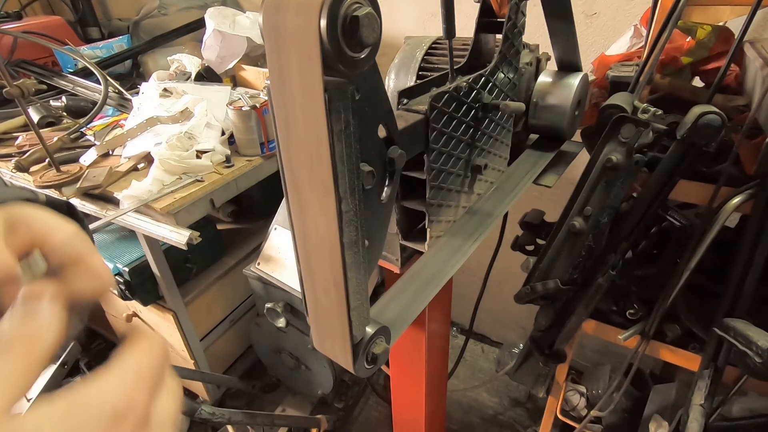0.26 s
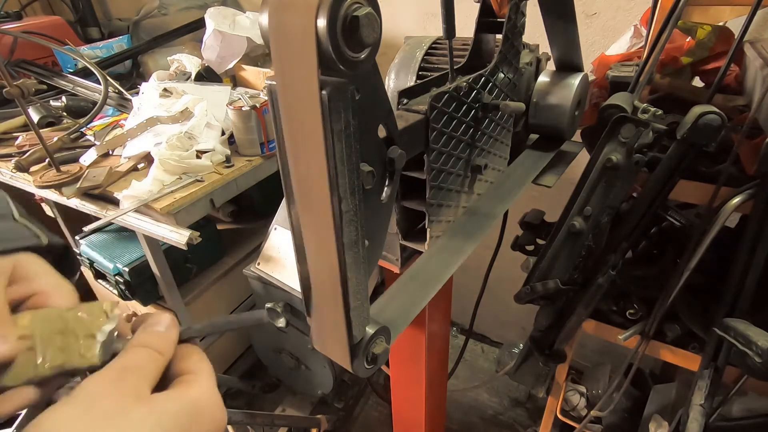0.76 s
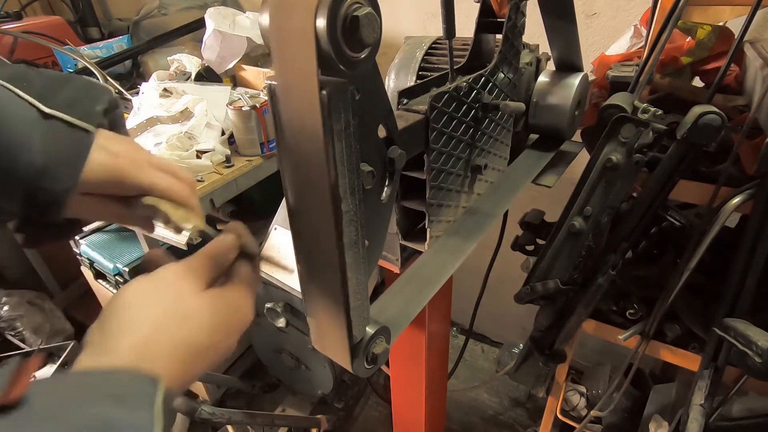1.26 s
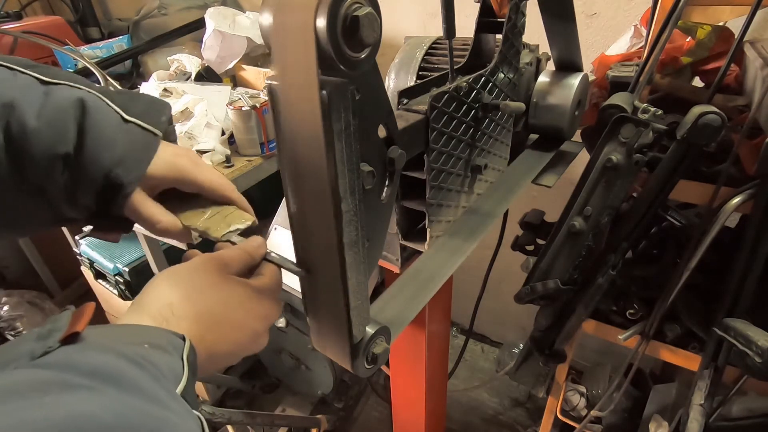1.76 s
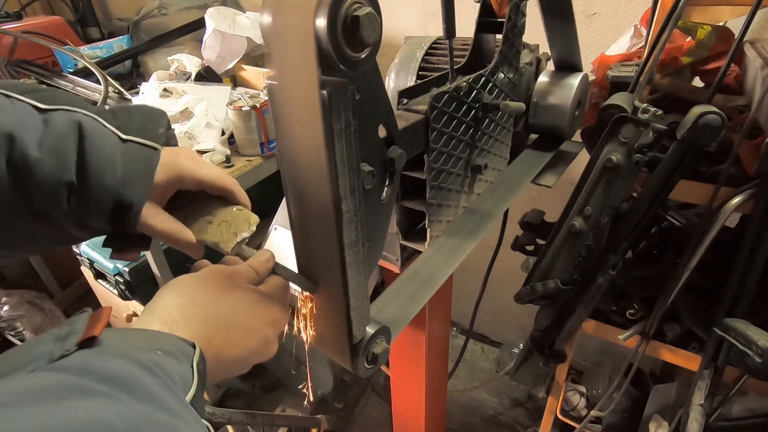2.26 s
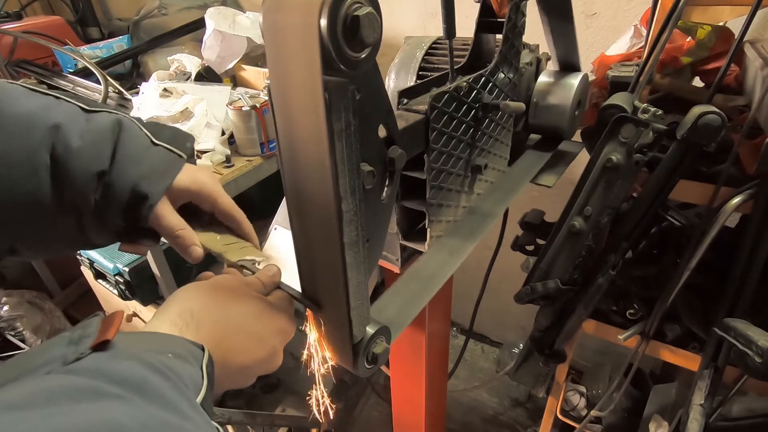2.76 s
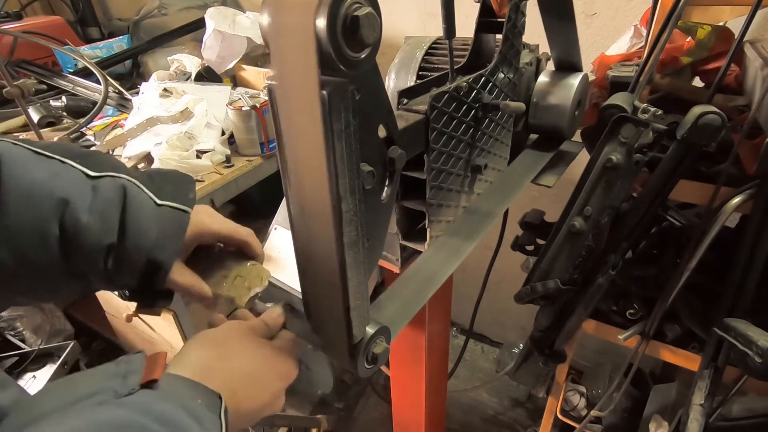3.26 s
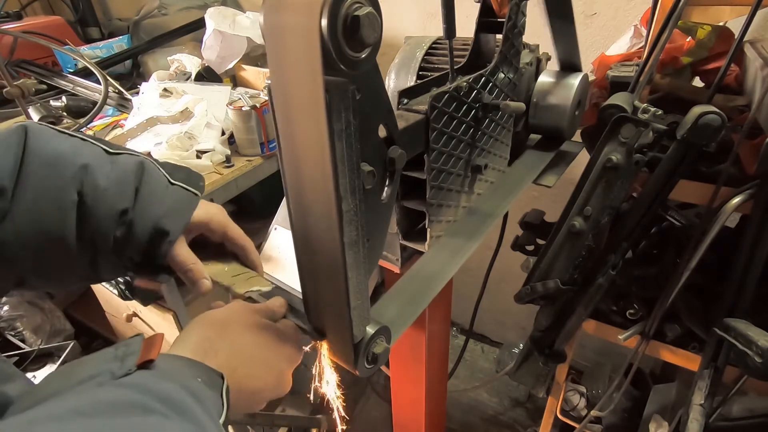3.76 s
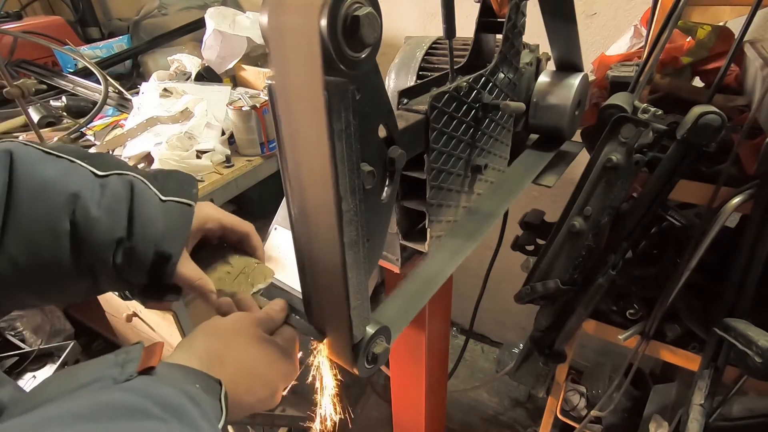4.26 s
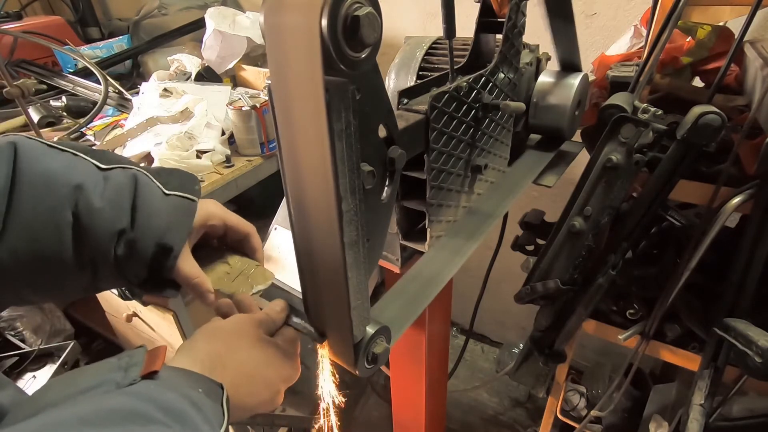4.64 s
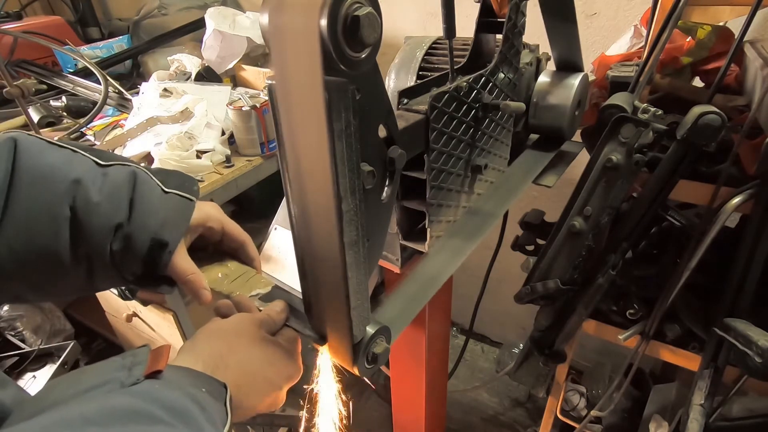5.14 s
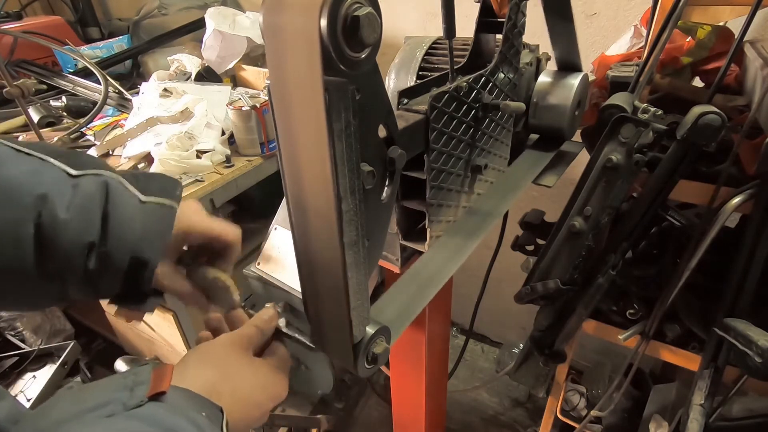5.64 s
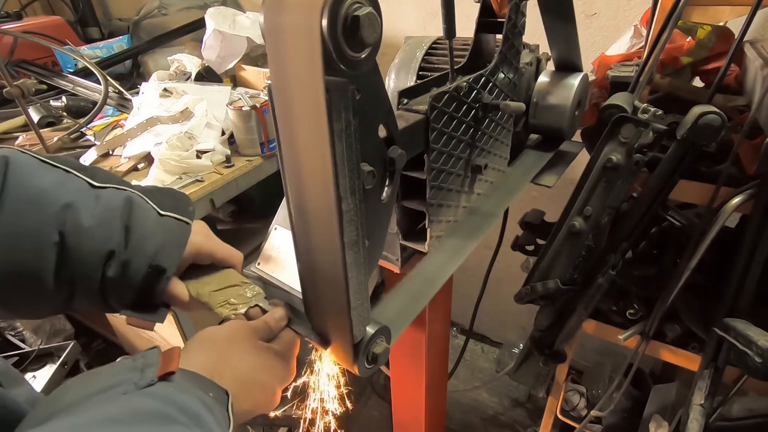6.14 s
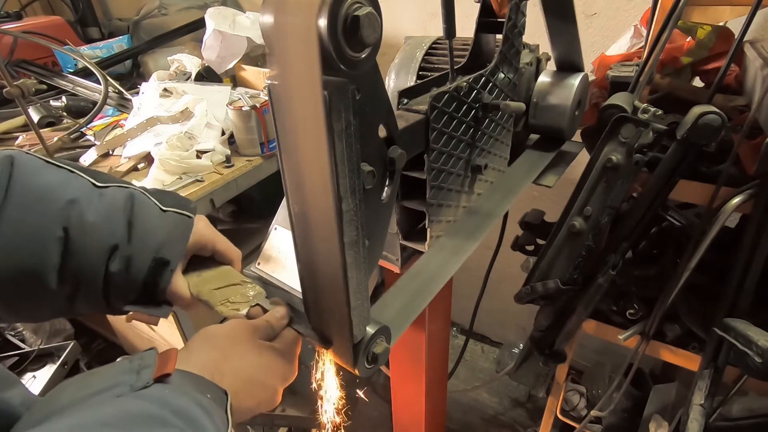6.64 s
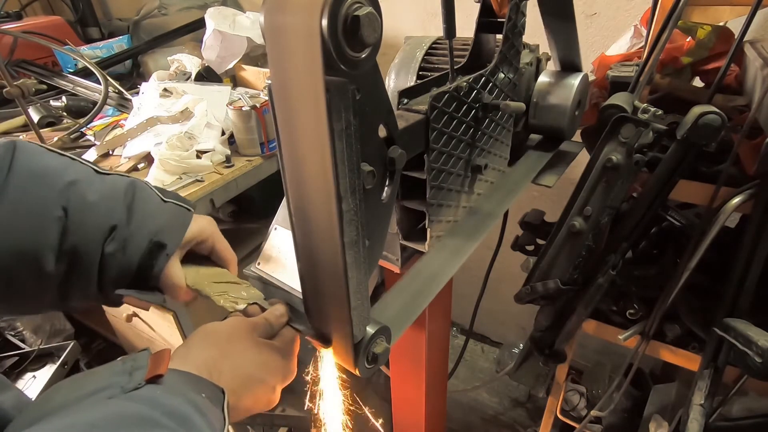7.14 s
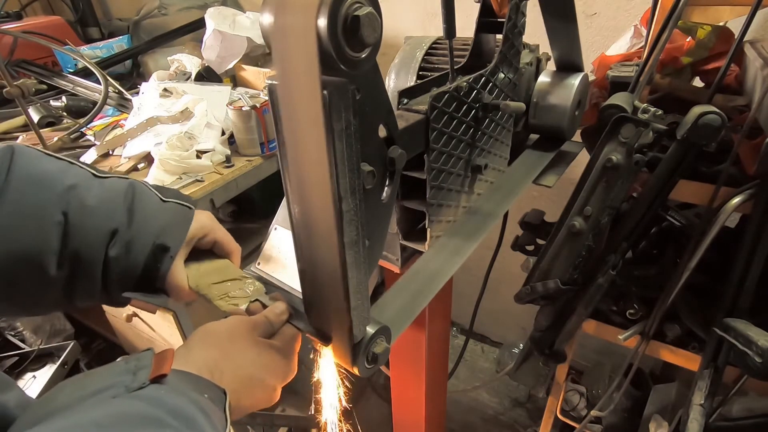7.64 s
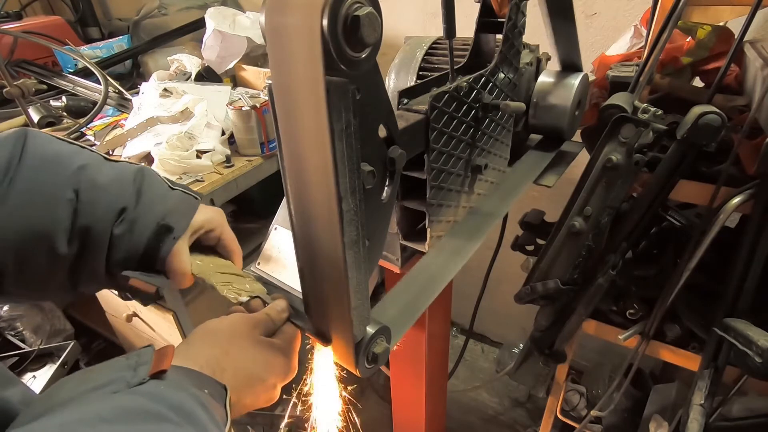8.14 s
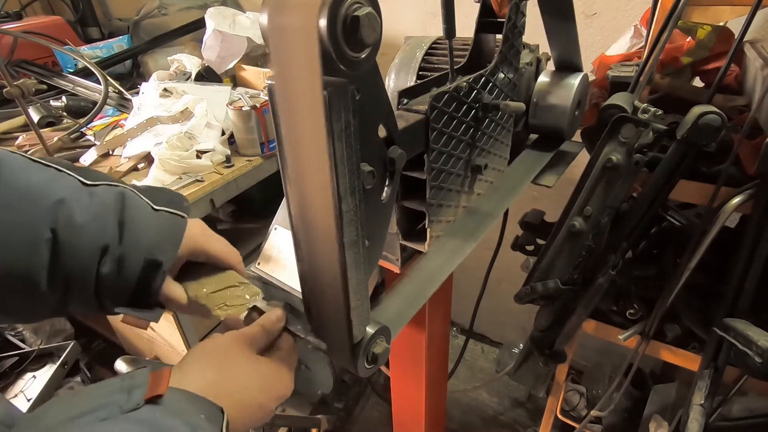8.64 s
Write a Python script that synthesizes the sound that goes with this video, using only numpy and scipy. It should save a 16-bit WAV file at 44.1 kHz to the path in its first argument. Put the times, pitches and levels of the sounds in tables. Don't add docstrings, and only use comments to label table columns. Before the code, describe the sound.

Close to the microphone in a workshop, a belt grinder runs constantly with a whirr, humming bearings and a rapid knock each wheel turn. A steel blade scratches the belt with a very high, gritty hiss. At first, loosely held, it sings and rings; then it is gripped and the hiss steadies with small wavers. Around 3.5, 6.3 and 7.9 seconds it eases off, and the machine noise swells.

```python
import sys
import numpy as np
from scipy import signal
from scipy.fft import rfft, irfft, next_fast_len
from scipy.io import wavfile
from scipy.ndimage import uniform_filter1d

SR = 44100
rng = np.random.default_rng(int(sys.argv[2]) if len(sys.argv) > 2 else 0)


def unload_audio(sound):
    columns = np.transpose(np.atleast_2d(sound))
    steps = np.round(np.clip(columns, -1, 1) * 32767)
    wavfile.write(sys.argv[1], SR, steps.astype(np.int16))


def gain_from_db(level_db):
    decades = np.asarray(level_db, float) / 20
    return 10 ** decades


N = 392490
HZ = np.maximum(np.fft.rfftfreq(next_fast_len(N), 1 / SR), 1)
TURN, FIRST_KNOCK_S = 1754, .019


def level(x, db):
    return x * gain_from_db(db) / np.sqrt(np.mean(x ** 2))


def curve(table, off_db=-120):
    s, *columns = np.transpose(table)
    ends_early = s[-1] < N / SR - 1
    t = np.arange(N) / SR
    return [np.interp(t, s, c, off_db, off_db if ends_early else c[-1]) for c in columns]


def spell(start_s, hold_s, rise_s, fall_s):
    corners = start_s + np.cumsum([0, rise_s, hold_s, fall_s])
    return np.interp(np.arange(N) / SR, corners, [0, 1, 1, 0])


def walk(rate):
    k = int(SR / rate)
    held = np.repeat(rng.standard_normal(N // 100)[:N // k + 1], k)
    return 1.34 * uniform_filter1d(uniform_filter1d(held, k), k)[:N]


def shape(x, gain):
    size = next_fast_len(N)
    return irfft(rfft(x, size) * gain, size)[:N]


def colour(points):
    hz, db = np.transpose(points)
    return gain_from_db(np.interp(np.log(HZ), np.log(hz), db))


def ring(hz, width):
    return 1 / (1 + 1j * (HZ / hz - hz / HZ) * hz / width)


def body(modes):
    return np.sqrt(sum(np.abs(gain_from_db(db) * ring(hz, width)) ** 2 for hz, width, db in modes))


# (time [s], lag [s])
SLIP = [
    (0, .001),
    (1.4, .0023),
    (1.75, .0015),
    (3.6, .0033),
    (4.4, .0018),
    (6.2, .0043),
    (7.3, .0028),
    (7.9, .003),
    (8.9, .0015),
]


def wheel():
    return np.maximum(np.arange(N) - curve(SLIP)[0] * SR, 0).astype(int)


def turning_noise(memory):
    memory = np.clip(memory, 0, .98)
    turns = rng.standard_normal((N // TURN + 21, TURN))
    turns = signal.lfilter([1], [1, -memory], turns, axis=0)[20:]
    return level(turns.ravel()[wheel()], 0)


def throb(depth_db, lag_s):
    angle = 2 * np.pi * (wheel() - (FIRST_KNOCK_S + lag_s) * SR) / TURN
    return gain_from_db(depth_db * (np.cos(angle) + 0.38 * np.cos(2 * angle)))


def grit(rough_db):
    scratches = turning_noise(memory=.2)
    return scratches * gain_from_db(rough_db * walk(300)) * throb(0.85, 0.0015)


# (time [s], hiss change [dB], half length
# [s])
WOBBLES = [(.2, -2.5, 0.25), (1.418, -1.5, 0.098), (1.13, 1, .1), (4.63, -2, 0.087), (.3, 0, .08),
           (5.2, -0.5, .1), (7.05, -1, 0.079), (3.28, -1, .1), (4.7, 1, .1), (1.57, -0.5, .1),
           (0.39, -2.5, 0.085), (.78, 1.5, .15), (0.923, -4.5, 0.54), (1.9, -5, 0.074),
           (2.197, -3.5, 0.062), (2.416, -0.5, 0.095), (2.544, -4.5, 0.091), (2.926, -3, 0.22),
           (3.167, -6, 0.051), (3.414, -5, .06), (3.586, -2, 0.067), (3.92, 4.5, 0.035), (4.047, 7, 0.041),
           (4.478, -5, 0.17), (4.81, -5.5, 0.14), (5.32, -2.5, 0.11), (5.64, -6, 0.05), (5.81, -7, 0.067),
           (6.08, -1.7, 0.38), (6.348, -1.5, 0.055), (6.7, -2, 0.022), (7.15, -1, 0.19), (7.5, -0.5, .3),
           (8.02, -3.5, 0.099), (8.3, 0.5, .2), (8.735, -2.5, .08), (8.884, 4, .04)]


def waver_db():
    return sum(db * spell(s - half, 0, half, half) for s, db, half in WOBBLES)


# (time [s], held off [s], back on within [s], hiss drop [dB])
LIFTS = [
    (-.1, 0.18, 0.66, -3.5),
    (1.21, 0.13, 0.21, -4),
    (3.52, 0.63, 0.13, -6.5),
    (6.3, 0.48, 0.22, -7.5),
    (7.87, 1.2, .1, -7.5),
]


def hand():
    pressed_db, lift_off_s = -30, 0.022
    off = [spell(s, hold, lift_off_s, back) for s, hold, back, _ in LIFTS]
    hiss_db = pressed_db + sum(row[3] * o for row, o in zip(LIFTS, off))
    return hiss_db + waver_db(), sum(off)


# (frequency [Hz], level [dB per Hz])
GRIT = [(10500, -30), (11600, -6), (12200, -2), (12500, 0), (15600, 0), (15800, -3)]
# (frequency [Hz], width [Hz], level [dB])
BLADE = [(12030, 90, -7), (12510, 110, 0), (12790, 130, 1), (13115, 70, 2), (13215, 50, 0), (13535, 100, 2),
         (13665, 60, 0), (14200, 110, -1), (14480, 120, -1), (14820, 150, -1), (15480, 250, -6)]
# (time [s], share of the top [dB])
ANGLE = [
    (0, -3),
    (.45, -4.5),
    (.7, -3.5),
    (.95, -2),
    (1.2, -1.7),
    (1.6, -3.5),
    (5.0, -3.5),
    (5.8, -2.5),
    (7.1, -5),
    (8.9, -5.5),
]


def hiss_of_steel(hiss_db):
    hiss = shape(grit(rough_db=-0.03), colour(GRIT) * (0.093 + body(BLADE))) * gain_from_db(0.82 * walk(13))
    top = shape(hiss, 1 / (1 + (13750 / HZ) ** 40))
    share = np.clip(gain_from_db(curve(ANGLE)[0]), .1, .95)
    hiss = level(top, 0) * share + level(hiss - top, 0) * np.sqrt(1 - share ** 2)
    return level(hiss, 0) * gain_from_db(hiss_db)


# (frequency [Hz], width [Hz], level [dB])
EDGE = [(10680, 89, 2), (10960, 90, -4), (11575, 126, -1.5)]


def edge_ring(hiss_db, freed):
    edge_db = -10.5 + 3.5 * freed - 2.5 * spell(-0.12, 1.32, 0.081, 0.15) + 1.0 * walk(19)
    modes = (0.063 + body(EDGE)) * np.abs(ring(11510, 1940)) ** 2
    edge = shape(grit(rough_db=1.5), modes) * gain_from_db(0.19 * walk(12))
    return level(edge, 0) * gain_from_db(hiss_db + edge_db)


# (frequency [Hz], level [dB per Hz])
SCUFF = [(1500, -27), (3500, -8), (5500, -0.5), (7500, 12), (8600, 12), (9300, 17.5), (10300, 14.5),
         (11000, -62), (12000, -42)]


def scuff(hiss_db):
    tilt_db = -0.46 * waver_db() * (1 - spell(-.1, 2.3, .1, .3))
    scrape = level(shape(grit(rough_db=3.0), colour(SCUFF)), -48.0)
    return scrape * gain_from_db(0.095 * (hiss_db + 20.5) + tilt_db + 1.4 * walk(11))


# (frequency [Hz], width [Hz], level [dB])
FLAT = [(7740, 170, -6), (8500, 42, -9), (8600, 33, -13), (9050, 100, -24), (8860, 91, -19),
        (9660, 440, -2.5)]
# (time [s], flat ring level [dB], tang ring level [dB])
LOOSE = [
    (0, -35.5, -44),
    (.2, -33, -60),
    (.32, -42.5, -45),
    (.7, -41.5, -43),
    (.82, -37.5, -49),
    (1.0, -35.5, -51),
    (1.2, -39.5, -48),
    (1.27, -55, -60),
    (1.5, -45, -64),
]


def loose_blade():
    flat_db, tang_db = curve(LOOSE)
    flat_modes = (0.36 + body(FLAT)) * np.abs(ring(8840, 2800)) ** 2 + 0.78 * np.abs(ring(13950, 170))
    flat = shape(grit(rough_db=1.0), flat_modes)
    tang = shape(grit(rough_db=0.8), ring(6100, 160) + 0.36 * ring(6100, 1400))
    return level(flat, 0) * gain_from_db(flat_db) + level(tang, -0.23) * gain_from_db(tang_db)


def blade():
    hiss_db, freed = hand()
    pressed = hiss_of_steel(hiss_db) + edge_ring(hiss_db, freed) + scuff(hiss_db)
    return pressed, loose_blade()


def knocks(modes, scatter_db):
    blows = np.zeros(N)
    at = np.arange(int(FIRST_KNOCK_S * SR), N, TURN)
    at = 2 * at - wheel()[at]
    blows[at] = gain_from_db(scatter_db * rng.standard_normal(len(at)))
    response = 0
    for s, hz, width, db in modes:
        delay = np.exp(-2j * np.pi * HZ * s)
        response = response + gain_from_db(db) * ring(hz, width) ** 2 * delay
    return shape(blows, response)


# (time after the blow [s], frequency [Hz], width [Hz], level [dB])
CORNER = [(.0084, 4200, 500, -3), (.0086, 4800, 600, 2), (.0088, 5750, 700, -1)]
# (time [s], length [s], level [dB])
CATCHES = [
    (.34, .08, -56),
    (4.062, 0.069, -58),
    (5.25, 0.55, -58),
    (8.63, 0.078, -58.5),
    (8.72, 0.03, -58),
    (8.77, .06, -60.5),
    (8.87, .05, -58),
]


def catches():
    edge_s = 0.022
    caught = sum(gain_from_db(db) * spell(s, length, edge_s, edge_s) for s, length, db in CATCHES)
    return level(knocks(CORNER, scatter_db=1.5), 0) * caught


# (frequency [Hz], level [dB])
HUM = [(301.6, -12), (3687, 0), (3880, -1), (4100, -1.5), (4188, -18), (4373, 1.5), (4460, 3.5),
       (6860, -26), (3680, -13), (4445, -4)]


def hum(whine_db):
    t = np.arange(N) / SR
    idler, top_bearing = 1, 6
    extra_db = {idler: whine_db, top_bearing: 5.5 * spell(7.7, .9, 0.15, 0.15)}
    tones = 0
    for k, (hz, db) in enumerate(HUM):
        strength = gain_from_db(db + 2 * walk(8) + extra_db.get(k, 0))
        tones = tones + strength * np.sin(2 * np.pi * hz * t + 1.6 * walk(14))
    return tones


# (frequency [Hz], level [dB per Hz])
WHIRR_MID = [(24, -64), (40, -49.5), (254, -13.5), (290, -8), (325, -11.5), (363, -6.5), (827, -3),
             (945, -4), (1930, -11), (2460, -7), (2820, -9), (4300, -7), (4910, -6), (7020, -6.5),
             (8200, -8.5), (10700, -57), (18000, -120)]


def whirr():
    low = 1 / (1 + (HZ / 2900) ** 4)
    wheel_noise = shape(turning_noise(memory=0.54), colour(WHIRR_MID) * np.sqrt(low))
    belt_noise = shape(turning_noise(memory=0.51), colour(WHIRR_MID) * np.sqrt(1 - low))
    return wheel_noise * throb(0.98, 0.0051) + belt_noise


# (frequency [Hz], level [dB per Hz])
WHIRR_SIDE = [(24, -57), (40, -44), (120, -28), (216, -12), (367, -5), (410, -8.5), (763, -13.5),
              (1940, -12), (2420, -5), (2640, -21), (3020, -3), (8000, -3.5), (10400, -35), (17600, -120)]
# (frequency [Hz], width [Hz], level [dB])
FRAME = [(541, 18, -6.5), (975, 55, -11), (1552, 16, -8.5), (2490, 22, -27), (3074, 245, -9),
         (3530, 23, -3.5), (3748, 47, -3.5), (3530, 16, -22), (4257, 69, -3), (4513, 24, 2.5),
         (5310, 60, -9), (5970, 130, -8), (6930, 110, -4), (7960, 13.5, 1.5)]
# (time after the blow [s], frequency [Hz], width [Hz], level [dB])
GUARD = [(.00023, 2540, 230, 0), (0, 2300, 170, -7), (0, 2980, 260, -8), (.003, 2480, 70, -10)]
# (time after the blow [s], frequency [Hz], width [Hz], level [dB])
THUMP = [(0.00691, 938, 72, 5.5), (0.005, 530, 56, 0), (0.0039, 1015, 88, -11), (0.00585, 366, 59, -5.5),
         (0.00592, 428, 30, -2.5), (0.00497, 1135, 56, -3.5)]
# (time [s], gain [dB])
GAIN = [(0, -1), (.42, -0.5), (1.19, -1.5), (1.34, 0.5), (1.6, -2.5), (2.55, -2), (3.52, -1), (3.6, 0.4),
        (3.84, 1.5), (4.24, -1.5), (6.27, -2), (6.36, -0.2), (6.67, 3.5), (6.93, 1), (7.05, -2),
        (7.88, -2.5), (8.3, 3.5), (8.9, -0.5)]
# (time [s], length [s], guard tick change [dB], bearing ring change [dB], idler whine change [dB])
RATTLES = [
    (0.1, 0.61, 5, -0.5, -2),
    (.75, 0.3, 3.5, 1, -2),
    (1.21, 0.19, 8, 3, -11),
    (3.545, 0.21, 7.5, 3, 7.5),
    (3.826, 0.17, 6.5, -3.5, 4.5),
    (6.297, 0.57, 7.5, 1.5, -4),
    (7.928, 0.48, 7.5, -0.5, 0),
]
# (time [s], length [s], thump change [dB])
BOOMS = [
    (-.05, 0.069, 5.5),
    (.25, 0.76, 1),
    (1.1, 0.092, -4),
    (1.4, 0.53, 2),
    (3, 0.63, -1.5),
    (4.0, 1, -1),
    (5.7, 0.94, -1.5),
    (7.5, 0.39, -5),
    (8.3, 0.49, -3.5),
]
# (time [s], length [s], ring change [dB])
SINGS = [(-.05, 0.22, -1), (.95, 1.17, -2.5), (2.55, 0.74, -1.5), (3.05, 0.45, 1.5), (3.55, 0.32, 3),
         (4.15, 0.83, 1.5), (6.28, 0.64, 2), (7.7, 0.49, 2), (8.0, 0.44, 2.5), (4.8, 0.94, -2),
         (7.0, 0.74, 0)]


def machine():
    swell_db = curve(GAIN)[0]
    free = np.transpose([spell(s, length, 0.022, 0.15) for s, length, *_ in RATTLES])
    _, _, guard_db, bearing_db, idler_db = np.transpose(RATTLES)

    def leant(rows):
        return sum(db * spell(s, length, 0.036, 0.036) for s, length, db in rows)

    thump_db = -2.5 + 0.3 * free @ guard_db + 0.42 * walk(6) + leant(BOOMS)
    ring_db = -3.5 + free @ bearing_db + 0.65 * walk(6) + leant(SINGS)
    tick_db = -9 + free @ guard_db - 0.27 * swell_db + 0.26 * walk(7.8)

    frame = shape(turning_noise(memory=0.18), body(FRAME)) * gain_from_db(2.6 * walk(14))
    side = shape(turning_noise(memory=0.28), colour(WHIRR_SIDE)) * gain_from_db(0.75 * walk(7))
    mid = level(whirr(), -47.5) * gain_from_db(1.0 * swell_db)
    mid = mid + level(frame, -49.5) * gain_from_db(1.44 * swell_db + 0.45 * ring_db)
    mid = mid + level(knocks(THUMP, scatter_db=1.24), -55.5) * gain_from_db(swell_db + thump_db)
    mid = mid + level(knocks(GUARD, scatter_db=1.2), -52.5) * gain_from_db(1.0 * swell_db + 1.93 * tick_db)
    mid = mid + level(hum(free @ idler_db), -52) * gain_from_db(0.97 * swell_db + 0.96 * ring_db)
    return mid, level(side, -47.0) * gain_from_db(1.34 * swell_db)


def mounts():
    t = np.arange(N) / SR - .272
    tones = sum(np.cos(2 * np.pi * hz * t) for hz in (288.6, 290.29))
    return gain_from_db(-69.5 + 0.79 * curve(GAIN)[0]) * tones


# (frequency [Hz], level [dB per Hz])
SPLIT = [(6500, -29), (8000, -13.5), (9500, -5.5), (10500, -6), (11700, 2), (12600, -15), (13800, -9),
         (14800, 2.5), (15700, -8)]


def split_treble():
    return level(shape(rng.standard_normal(N), colour(SPLIT)), -36.0) * gain_from_db(2 * walk(20))


# (time [s], length [s], level [dB])
GUSTS = [
    (5.463, .08, -71),
    (5.58, .2, -64.5),
    (5.84, 0.36, -66),
    (6.48, 0.1, -75),
    (8.2, 0.57, -75.5),
]


def draught():
    still_db, edge_s = -85, 0.036
    gusts = gain_from_db(2.5 * walk(40) + .8 * walk(7))
    puffs = [level(shape(rng.standard_normal(N), ring(100, 200)) * gusts, db) for db in (-2, -7)]
    blowing = sum(gain_from_db(db) * spell(s - edge_s, length, edge_s, 2 * edge_s) for s, length, db in GUSTS)
    return (gain_from_db(still_db + 2.8 * walk(7.2)) + blowing) * np.array(puffs)


def scene():
    pressed, loose = blade()
    machine_mid, machine_side = machine()
    air_mid, air_side = draught()
    smear = rng.standard_normal(300) * np.exp(-np.arange(300) / 60)
    loose_side = gain_from_db(-19.5) * signal.fftconvolve(loose, smear)[:N] + 0.23 * loose
    motor = mounts()
    mid = pressed + loose + catches() + machine_mid + motor + air_mid
    side = loose_side + machine_side + split_treble() + air_side + .2 * motor
    return np.array([mid + side, mid - side])


# (from [Hz], to [Hz], rule [number], side kept early [0-1], side kept late [0-1])
KEPT = [(8270, 8960, 0, .5, .9), (8960, 9650, 5, .4, .9), (9650, 10340, 1, .2, .95),
        (10340, 11020, 2, .0, .75), (11020, 11710, 4, .0, .65), (11710, 12400, 3, .03, .25),
        (12400, 13090, 3, .2, .1), (13090, 13780, 3, .12, .12), (13780, 14470, 3, .08, .3),
        (14470, 15160, 2, .08, .15), (15160, 15740, 2, .01, .15)]
# (time [s], length [s])
SHORT = [(1.64, 0.07), (1.78, 0.15), (2.04, 0.09), (2.2, 0.09), (2.37, 0.19), (2.6, 0.24), (2.9, 0.09),
         (3.07, 0.79), (3.9, 0.1), (4.2, 0.16), (4.43, 0.27), (4.73, 0.66), (5.43, 0.2), (5.66, 0.15),
         (5.85, 0.13), (6.0, 0.24), (6.28, 0.22), (6.55, 0.11), (6.69, 0.09), (6.91, 0.69), (7.63, 0.29),
         (7.97, 0.51), (8.5, 0.33)]
# (time [s], length [s])
SHORTER = [(1.99, 0.05), (2.1, 0.08), (2.36, 0.04), (2.45, 0.04), (2.62, 0.04), (2.22, 0.09), (2.79, 0.08),
           (2.9, 0.31), (3.34, 0.11), (3.58, 0.09), (3.77, 0.06), (3.96, 0.09), (4.17, 0.29), (4.52, 0.17),
           (4.8, 0.89), (5.71, 0.09), (5.84, 0.31), (6.18, 0.27), (6.62, 0.98), (7.63, 0.3), (8.0, 0.09),
           (8.15, 0.37), (8.54, 0.26)]
# (time [s], length [s])
DRY = [(2.12, 0.06), (2.36, 0.04), (2.5, 0.06), (2.66, 0.04), (2.75, 0.04), (2.86, 0.15), (3.08, 0.04),
       (3.28, 0.07), (3.38, 0.06), (3.92, 0.08), (4.11, 0.24), (4.39, 0.09), (4.5, 0.16), (4.71, 0.06),
       (4.81, 1.52), (6.48, 0.11), (6.69, 0.23), (6.99, 0.16), (7.19, 0.16), (7.45, 0.08), (7.56, 0.2),
       (7.84, 0.11), (8.01, 0.09), (8.34, 0.09), (8.47, 0.05), (8.54, 0.05), (8.71, 0.2)]
# (time [s], length [s], from [Hz], to [Hz])
STALLS = [(3.56, .08, 15160, 15740), (3.72, .06, 14470, 15740), (3.84, .05, 15160, 15740),
          (4.21, .04, 10340, 11020), (5.58, .11, 10340, 11710), (5.69, .06, 10340, 11020),
          (5.71, .08, 7580, 9650), (5.77, .05, 11020, 11710), (6.37, .09, 10340, 11020),
          (6.43, .06, 15160, 15740), (6.5, .06, 10340, 11020), (6.59, .05, 15160, 15740),
          (6.67, .05, 15160, 15740), (6.69, .07, 8960, 11020), (6.69, .04, 11020, 11710),
          (6.76, .06, 14470, 15740), (6.82, .05, 10340, 11020), (6.95, .05, 15160, 15740),
          (7.95, .17, 15160, 15740), (7.97, .11, 10340, 11020), (8.07, .04, 14470, 15160),
          (8.27, .05, 10340, 11710), (8.31, .07, 14470, 15740), (8.48, .12, 15160, 15740),
          (8.53, .08, 14470, 15160), (8.63, .04, 14470, 15740), (8.75, .05, 10340, 11020),
          (8.82, .05, 10340, 11710), (8.81, .05, 15160, 15740), (5.25, .05, 11450, 11850),
          (5.34, .04, 11450, 11850), (5.41, .06, 11450, 11850), (5.96, .25, 11450, 11800),
          (6.72, .13, 14470, 14850), (6.87, .05, 11370, 11900), (7.08, .05, 11370, 11900),
          (7.43, .05, 11450, 11850), (8.11, .18, 10750, 11050), (6.52, .1, 9900, 10340)]


def starve(mid, side, coarse=1.35):
    top_thins = .3
    flicker = .12
    hz, s, both = signal.stft(np.array([mid, side]), SR, nperseg=2048, noverlap=1536)
    late = np.clip((s - 1.3) / 4, 0, 1)

    def outside(spells):
        return np.prod([(s < start) | (s > start + length) for start, length in spells], axis=0)

    top = 1 - top_thins * late ** 2.2 * np.interp(s, np.arange(N) / SR, hand()[1])
    filled = [outside(SHORT),
              outside(DRY),
              1 - flicker * (1 - top) / top_thins,
              np.ones(len(s)),
              1 - .14 * late ** 3,
              outside(SHORTER) * (1 - flicker * (s > 1.5))]
    luck = np.repeat(rng.random((len(s), len(KEPT), 2)), 4, axis=0)[:len(s)]
    for k, (lo, hi, rule, early, kept_late) in enumerate(KEPT):
        band = (hz >= lo) & (hz < hi)
        both[0, band] *= luck[:, k, 0] < filled[rule]
        side_kept = early + (kept_late - early) * late + 3 * (1 - top) * (rule == 2)
        both[1, band] *= luck[:, k, 1] < side_kept + (s < .33) * (hi < 10400)
    for start, length, lo, hi in STALLS:
        both[0, (hz >= lo) & (hz < hi)] *= outside([(start, length)])
    power = np.abs(both[1]) ** 2
    both[1] *= power > coarse * uniform_filter1d(power, size=24, axis=0)
    both[:, hz > KEPT[-1][1]] = 0
    return signal.istft(both, SR, nperseg=2048, noverlap=1536)[1][:, :N]


def band_limit(x):
    return signal.sosfilt(signal.butter(12, 16680, fs=SR, output="sos"), x)


def record(dry):
    mid, side = starve((dry[0] + dry[1]) / 2, (dry[0] - dry[1]) / 2)
    machine_left = 0.071 * shape(mid, np.abs(ring(5500, 6000)) ** 2)
    start_left = 0.043 * spell(-.1, .45, .1, 1.1) * mid
    side = side + machine_left + start_left
    return band_limit(np.array([mid + side, mid - side]))


dry = scene()
out = record(dry)
unload_audio(out)
```